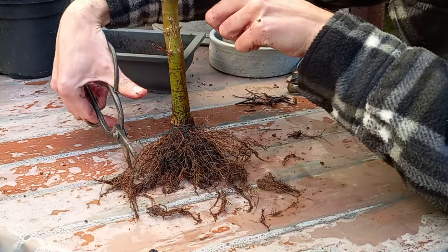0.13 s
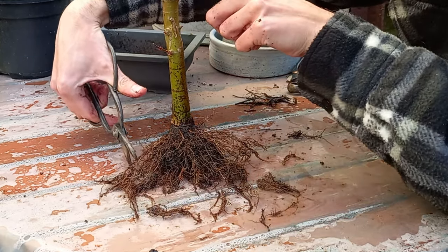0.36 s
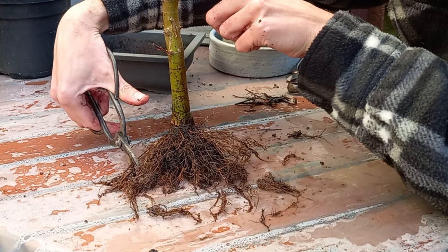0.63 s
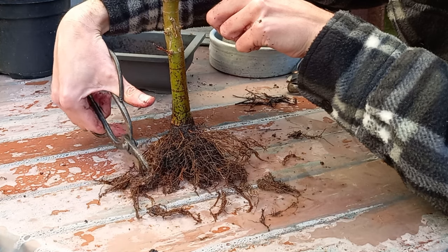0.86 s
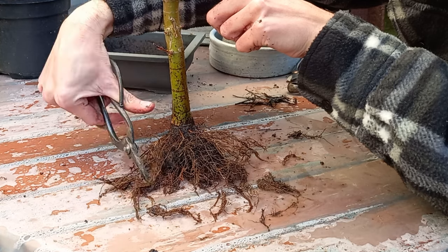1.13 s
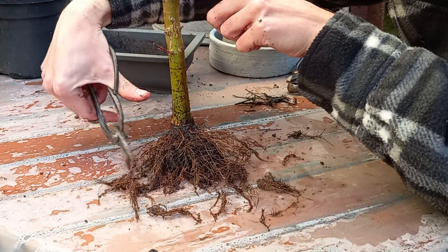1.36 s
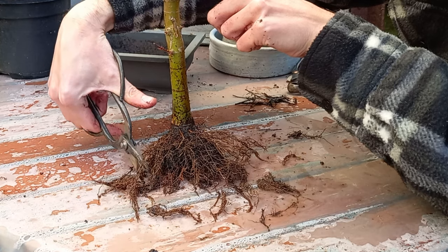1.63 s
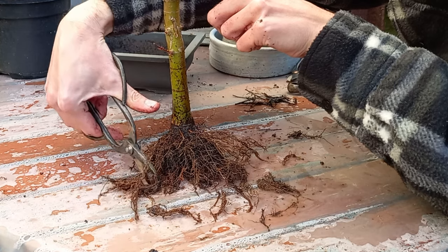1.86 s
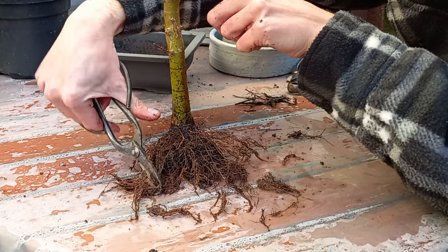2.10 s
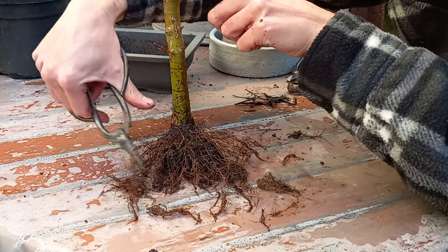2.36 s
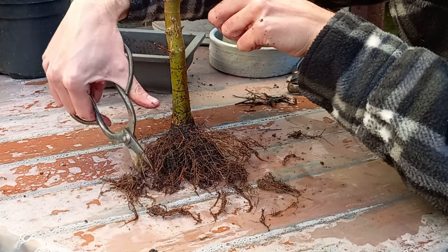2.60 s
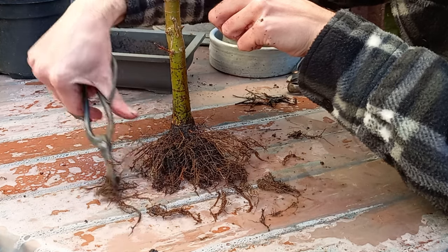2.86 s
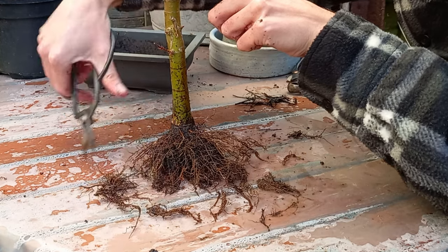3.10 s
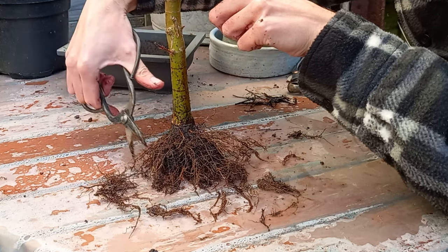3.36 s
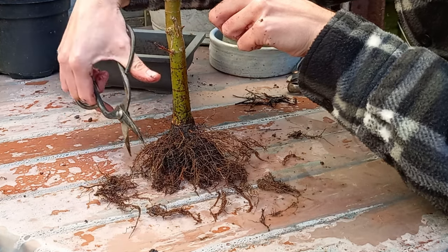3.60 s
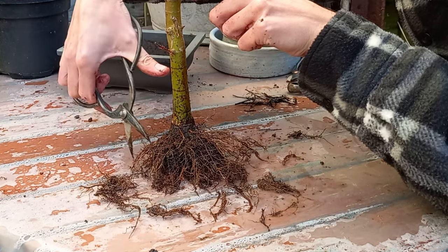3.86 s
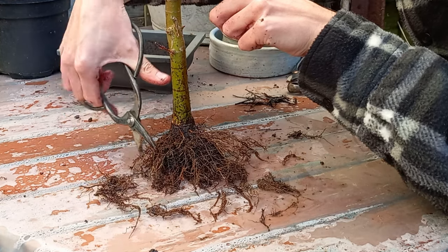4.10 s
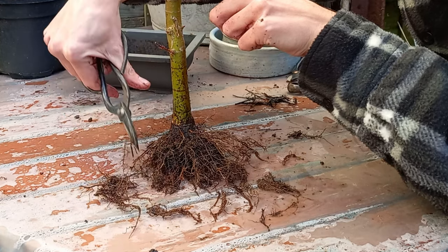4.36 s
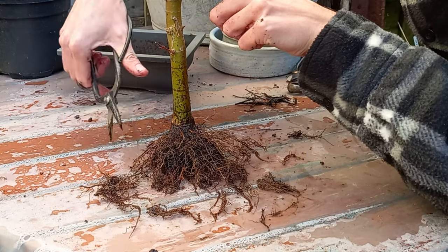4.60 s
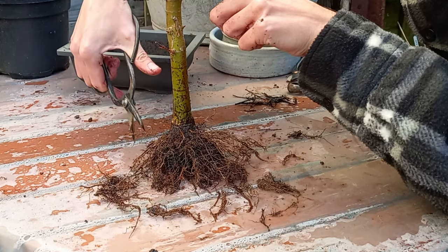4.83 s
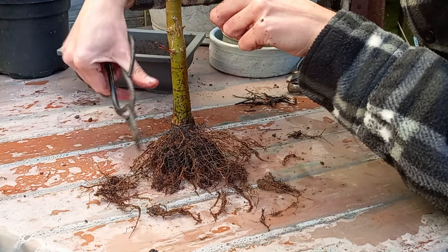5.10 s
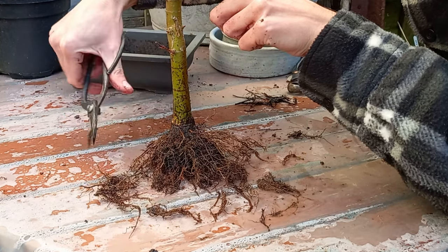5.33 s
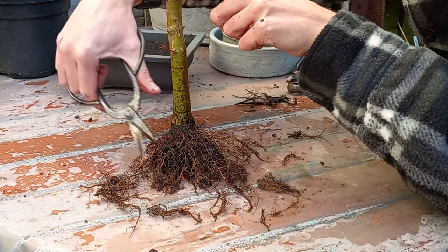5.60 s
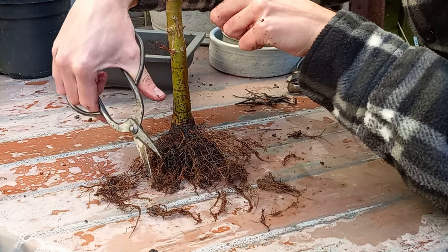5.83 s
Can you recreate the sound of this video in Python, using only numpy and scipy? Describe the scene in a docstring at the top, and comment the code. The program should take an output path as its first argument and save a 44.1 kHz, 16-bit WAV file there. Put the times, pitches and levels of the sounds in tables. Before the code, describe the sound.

A quiet outdoor yard in close mono, with steady bright hiss and soft distant rumble throughout. At the very start the tail of a faint bird chirp fades; around 0.13 s comes a barely audible metal tick, then a dull faint knock on wood at 0.2. At 1.38 s small steel scissors snap shut: by far the loudest sound, a sharp, glittering high click with a brief rattle and a short echo off nearby walls. A softer double click at 2.39 carries a muted wooden knock, with a tiny tick at 2.57. Around 3.17-3.22 a faint, scratchy cluster of ticks and blade scrape follows. Moderate crisp snips come at 4.49 and 5.37, with faint reopening scrapes at about 4.66 and 5.55. From 5.4 s to the end near 6 s, a far bird sings quick, fluttering, mostly falling high notes, breathy and blurred by echo, strongest around 5.6-5.8.

```python
"""Outdoor wooden bench: small steel scissors snip fine roots close to a mono microphone.
Blades clack shut, rattle briefly and scrape as they reopen: impulses and rough noise drive steel modes.
Knocks on the bench ring decaying sines. A far bird sings mostly falling notes, as fluttering glides
with noise echoes. Shaped noise gives the bright hiss and far rumble."""
import sys
import numpy as np
from scipy import signal
from scipy.fft import rfft, irfft, next_fast_len
from scipy.io import wavfile

SR = 44100
rng = np.random.default_rng(int(sys.argv[2]) if len(sys.argv) > 2 else 0)


def inscribe(sig):
    """Save sig as 16-bit PCM at rate SR to the path in sys.argv[1].

    A 1-D sig is mono; a 2-D sig holds one channel per row.
    Samples are clipped to [-1, 1] before scaling.
    """
    pcm = np.round(np.clip(np.atleast_2d(sig).T, -1, 1) * 32767)
    wavfile.write(sys.argv[1], SR, pcm.astype(np.int16))


def volts_from_db(level):
    """Convert decibel levels to linear amplitude ratios."""
    exponent = np.asarray(level, float) / 20
    return 10 ** exponent


N = 262994

HANDLE_DB = -11  # blade contacts barely move the handle modes under 3 kHz
CONTACT_T_S = np.arange(SR // 8) / SR


def along(points, hz):
    """Read (Hz, value) points on a log frequency axis."""
    point_hz, value = np.transpose(points)
    return np.interp(np.log(hz + 1), np.log(point_hz + 1), value)


def filtered(x, response):
    """Apply a complex response of frequency to x."""
    size = next_fast_len(len(x) + 8192)
    spectrum = rfft(x, size) * response(np.fft.rfftfreq(size, 1 / SR))
    return irfft(spectrum, size)[:len(x)]


def add(track, start_s, sound):
    """Lay a sound on the track from start_s."""
    part = track[round(start_s * SR):][:len(sound)]
    part += sound[:len(part)]


def steel(force, handle_db, blade_db, fav_hz, lift_db, damp=1):
    """Resonant modes of the scissors; where the metal touches decides which answer most."""
    # scissors resonances before contact offsets and damping: mode_hz, width_hz, level_db
    modes = [(908, 192, -47), (1120, 18, -29), (1528, 330, -42), (1953, 123, -21.5), (2087, 110, -20),
             (2770, 120, -34.5), (3760, 119, -27), (4645, 310, -17), (5450, 330, -20.5), (6070, 470, -13),
             (6580, 290, -13.5), (7000, 223, -10), (7610, 148, -10), (8300, 372, -11.5), (8600, 280, -7.5),
             (9430, 260, -13), (10600, 180, -17), (10870, 320, -23), (12640, 400, -6), (13100, 140, 0),
             (13750, 420, -7), (14320, 200, -0.5), (14850, 200, -10), (15300, 400, -5)]
    mode_hz, width_hz, level_db = np.transpose(modes)[:, :, None]
    is_handle = mode_hz < 3000
    is_blade = (mode_hz >= 3000) * (mode_hz < 11500)
    favour = np.exp(-(np.log(mode_hz / fav_hz) / 0.11) ** 2)
    gain = volts_from_db(level_db + handle_db * is_handle + blade_db * is_blade + lift_db * favour)
    width_hz = width_hz * damp
    sign = (-1.) ** np.arange(len(modes))[:, None]

    def response(hz):
        loss = 1j * hz * width_hz
        return np.sum(sign * gain * loss / (mode_hz * mode_hz - hz * hz + loss), axis=0)

    return 12 * filtered(force, response)


def grit(count):
    """Rough contact force of unit rms: noise with scattered sharper grains."""
    force = rng.standard_normal(count) * volts_from_db(3 * rng.standard_normal(count))
    return force / np.sqrt(np.mean(force ** 2))


def blade_clacks():
    """Blades shear past each other, strike once (an impulse) and rattle out."""
    # blade contacts: start_s, blow_db, blade_db (modes 3 to 11.5 kHz), fav_hz, lift_db
    contacts = [(0.1333, -53, 11, 6870, 17), (1.38, -1, -1.5, 10600, 3.5), (1.3823, -14.5, -3.5, 10600, 5),
                (1.4235, -44, 7, 8400, 2.5), (2.3882, -20, 4, 3760, 22), (2.3894, -23, 11, 8600, 2.5),
                (2.5715, -53, 10, 6820, 19), (3.1730, -47, 16, 6900, 19), (3.1766, -39, 12.5, 6600, 20),
                (3.1817, -42, 16.5, 6960, 17), (3.1872, -38, 10, 6537, 19), (3.1898, -39, 11, 6500, 20),
                (4.486, -21, 2.5, 7040, -1), (4.4900, -26, 3, 8050, 2), (4.5000, -36.5, 3.5, 8600, 2.5),
                (4.6581, -52, 11, 8600, 16), (5.3700, -22.5, -0.5, 6070, 8), (5.5518, -47, 3, 14000, 9.5),
                (5.5760, -46, 6, 10600, 25)]
    rattle_db, rattle_db_per_db = -19, -.03  # under a 0 dB blow; soft blows are more rattle
    rattle_t60_s, rattle_s_per_db, rattle_min_s = .059, .0009, .018  # harder blows rattle longer
    shear_s, shear_db, shear_rise_db = .005, -22, 42
    track, t = np.zeros(N), CONTACT_T_S
    shear = volts_from_db(shear_rise_db * (t / shear_s - 1)) * (t < shear_s)
    for start_s, blow_db, *touch in contacts:
        t60_s = max(rattle_min_s, rattle_t60_s + rattle_s_per_db * blow_db)
        force = volts_from_db(rattle_db + rattle_db_per_db * blow_db - 60 * t / t60_s) * grit(len(t))
        force[0] += 1
        add(track, start_s, volts_from_db(blow_db) * steel(force, HANDLE_DB, *touch))
        shear_ring = steel(shear * grit(len(t)), HANDLE_DB, *touch)
        add(track, start_s - shear_s, volts_from_db(blow_db + shear_db) * shear_ring)
    return track


def handle_stops():
    """Handle loops meet with a softened impulse and chatter; the hand widens the modes."""
    # loop contacts: start_s, level_db, chatter_db (re level), fav_hz, lift_db
    stops = [(1.3800, 5, -38, 1120, -6), (2.3890, -11, -27, 1120, 9)]
    blade_db, damp, chatter_t60_s = -25, 1.6, .2  # blades barely answer
    track, t = np.zeros(N), CONTACT_T_S
    for start_s, level_db, chatter_db, *touch in stops:
        force = volts_from_db(chatter_db - 60 * t / chatter_t60_s) * grit(len(t))
        force[0] += 1
        soft_force = np.convolve(force, np.hanning(12) / 5.5)[:len(t)]
        add(track, start_s, volts_from_db(level_db) * steel(soft_force, 0, blade_db, *touch, damp))
    return track


def blade_slides():
    """Blades slide on each other: swells of rough force; pressed blades widen their modes."""
    # slides: start_s, length_s, level_db, blade_db (modes 3 to 11.5 kHz), fav_hz
    slides = [(.128, .016, -68.5, 9, 7000), (2.383, .009, -54, 10, 7000), (2.572, .03, -65.5, 9, 6500),
              (3.172, 0.059, -53, 6, 14850), (3.191, .016, -59, 13, 5400), (3.204, .02, -61, 13, 6000),
              (4.482, .008, -53, 0, 13100), (4.657, 0.032, -63, 6, 13500), (5.544, 0.045, -58, 5, 14000)]
    lift_db, skew, damp = 6, 0.86, 2.4  # skew < 1: quick to bite, slower to let go
    track, t = np.zeros(N), CONTACT_T_S
    for start_s, length_s, level_db, *touch in slides:
        swell = np.sin(np.pi * np.clip(t / length_s, 0, 1) ** skew)
        ring = steel(swell * grit(len(t)), HANDLE_DB, *touch, lift_db, damp)
        add(track, start_s, volts_from_db(level_db) * ring)
    return track


def scissors():
    """Sum of the scissors' contacts: clacks, handle stops and slides."""
    return blade_clacks() + handle_stops() + blade_slides()


def yard(x):
    """Nearby walls answer with decaying noise; each frequency dies at its own speed."""
    # wall echo decay: freq_hz, t60_s
    decay = [(500, .22), (2000, .22), (4000, .16), (9000, .09), (16000, .07)]
    hz, t, z = signal.stft(rng.standard_normal(SR // 3), SR, nperseg=256)
    z = z * volts_from_db(-60 * t / along(decay, hz)[:, None])
    tail = signal.istft(z, SR, nperseg=256)[1]
    delayed = np.pad(x, (300, 0))  # samples
    return signal.fftconvolve(delayed, tail / np.linalg.norm(tail))[:N]


def bench():
    """Soft knocks ring the boards' modes; the place of the knock favours some."""
    # board modes: mode_hz, level_db, t60_s
    boards = [(180, 0, 0.13), (290, -1, 0.088), (369.6, 3.5, 0.09), (440.2, 1.5, 0.085), (610, 1.5, 0.059)]
    # knocks: start_s, level_db, fav_hz
    knocks = [(.193, -46, 454), (.2, -47.5, 301), (1.817, -61, 416), (2.389, -47.5, 218.6),
              (2.395, -40.5, 374), (2.432, -52.5, 400), (2.459, -59, 180), (2.548, -55, 180),
              (3.2, -58.5, 183), (3.27, -59, 290), (3.38, -61, 200), (3.459, -63, 290), (3.79, -58, 270)]
    track, t = np.zeros(N), np.arange(SR // 4) / SR
    onset = 1 - np.exp(-t / 0.0028)
    for start_s, knock_db, fav_hz in knocks:
        ring = np.zeros(len(t))
        for mode_hz, mode_db, t60_s in boards:
            off_db = -89.0 * np.log2(mode_hz / fav_hz) ** 2
            ring += volts_from_db(mode_db + off_db - 60 * t / t60_s) * np.sin(2 * np.pi * mode_hz * t)
        add(track, start_s, volts_from_db(knock_db) * ring * onset)
    return track


def bird():
    """Gliding, breathy whistles, each smeared by its own decaying noise echo."""
    # notes: start_s (negative: already sounding), length_s, first_hz, last_hz, level_db (before flutter)
    song = [(-.02, .075, 3300, 3205, -58), (-.02, 0.072, 2095, 2100, -64.5),
            (.008, .048, 4020, 3990, -59.5), (5.375, 0.032, 7000, 6870, -49), (5.39, .045, 6150, 5750, -45),
            (5.405, .07, 4460, 4300, -55), (5.445, .1, 4150, 3970, -56), (5.51, .078, 6700, 7100, -54),
            (5.525, .095, 4160, 3650, -55.5), (5.615, .065, 7520, 6250, -46),
            (5.625, .075, 4500, 4250, -57), (5.635, .075, 7500, 7100, -56), (5.687, .04, 6350, 6600, -41),
            (5.706, .022, 7100, 5170, -46), (5.722, .09, 5600, 5710, -43), (5.729, 0.093, 5490, 5240, -51),
            (5.767, 0.036, 4550, 4270, -48.5), (5.795, 0.041, 4210, 3800, -50),
            (5.815, .075, 4920, 4920, -53.5), (5.84, .045, 3800, 3780, -59)]
    swell_share, start_db, end_db = 0.4, -10, -13.5  # swell to a peak, then fade
    # low notes buzz, high ones whistle, breathier on wide glides
    buzz_below_hz, buzz_hz, whistle_hz, blur_per_glide = 4700, 390, 115, .3
    echo_db, echo_t60_s, echo_gap_s = -5.5, 0.47, .006
    lead = SR // 10  # samples of room for notes starting before zero
    track, late_s = np.zeros(N + lead), np.arange(SR // 3) / SR
    for start_s, length_s, first_hz, last_hz, level_db in song:
        t = np.arange(0, length_s, 1 / SR)
        glide_hz = last_hz - first_hz
        blur_hz = buzz_hz if first_hz < buzz_below_hz else whistle_hz + blur_per_glide * abs(glide_hz)
        # quick random flutter in size spreads the whistle into a narrow band
        breath = filtered(rng.standard_normal(SR // 8), lambda f: np.exp(-(f / blur_hz) ** 2))[:len(t)]
        flutter = .5 + 1.27 * breath / np.std(breath)
        fade = np.clip(np.minimum(t, length_s - t) / 0.0025, 0, 1)
        swell_db = np.interp(t / length_s, [0, swell_share, 1], [start_db, 0, end_db])
        size = fade * volts_from_db(level_db + swell_db) * flutter
        pitch_hz = first_hz + glide_hz * t / length_s
        tone = size * np.sin(2 * np.pi * np.cumsum(pitch_hz) / SR)
        echo = rng.standard_normal(len(late_s)) * volts_from_db(-60 * late_s / echo_t60_s) * (late_s > echo_gap_s)
        echo *= volts_from_db(echo_db) / np.linalg.norm(echo)
        echo[0] = 1  # direct sound
        add(track, start_s + lead / SR, signal.fftconvolve(tone, echo))
    return track[lead:]


def hiss():
    """Microphone hiss and far outdoor rumble: shaped noise whose level drifts a little."""
    # relative noise density: freq_hz, density_db (per Hz)
    density = [(18, -49), (40, -33), (56, -4), (75, -8.5), (110, -2), (260, -5), (600, -8.5), (1400, -10),
               (2450, -10), (2800, -6.5), (3550, -6.5), (3850, -2.5), (15750, -1.5), (16100, -39),
               (22000, -90.5)]
    # noise rms: time_s, level_db
    drift = [(0.0, -55), (0.4, -56), (0.87, -54), (5.21, -54), (5.3, -54)]
    noise = filtered(rng.standard_normal(N), lambda hz: volts_from_db(along(density, hz)))
    level_db = np.interp(np.arange(N) / SR, *np.transpose(drift))
    return volts_from_db(level_db) * noise / np.std(noise)


def scene():
    """All sources in one mono mix, copied to both channels; the microphone rolls off the scissors."""
    mic_top_hz, mic_steep = 16300, 40
    near = scissors()
    near = near + volts_from_db(-19.5) * yard(near)
    near = filtered(near, lambda hz: 1 / (1 + (hz / mic_top_hz) ** mic_steep))
    mono = near + bench() + bird() + hiss()
    return np.array([mono, mono])


def band_limit(x):
    """A steep low-pass at the top of the band."""
    return signal.sosfilt(signal.butter(12, 16810, fs=SR, output="sos"), x)


def record(dry):
    """Deliver the finished mix."""
    return band_limit(dry)


dry = scene()
out = record(dry)
inscribe(out)
```